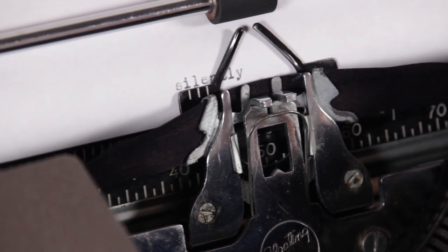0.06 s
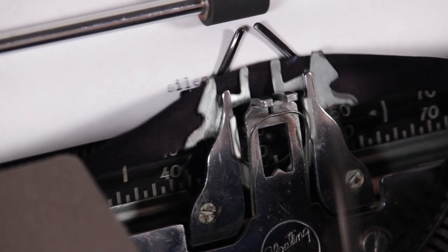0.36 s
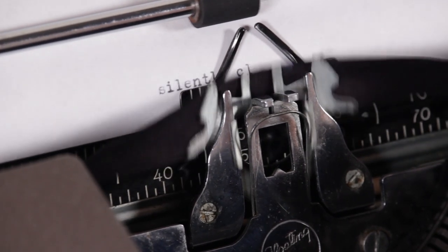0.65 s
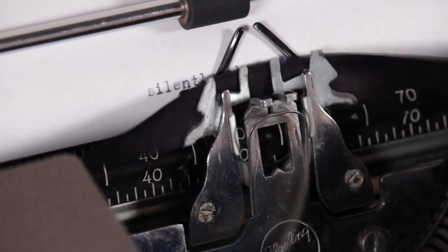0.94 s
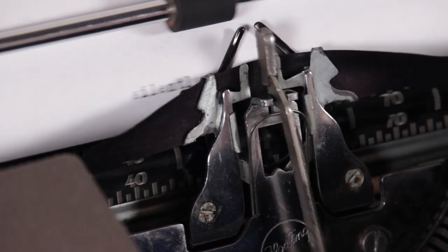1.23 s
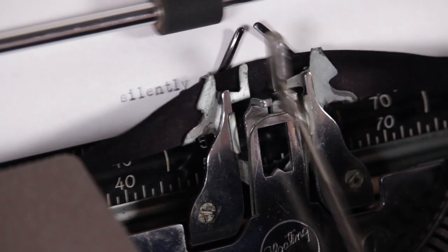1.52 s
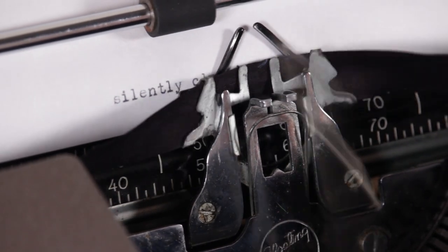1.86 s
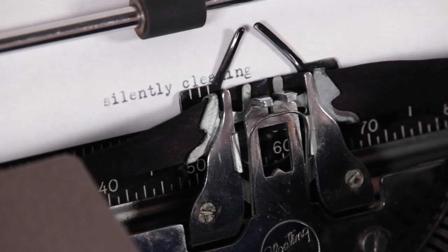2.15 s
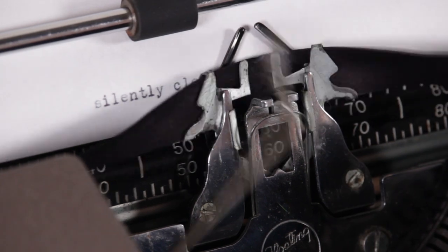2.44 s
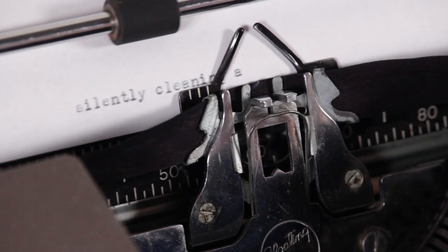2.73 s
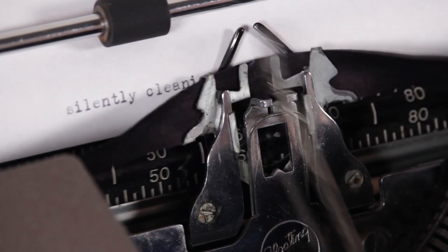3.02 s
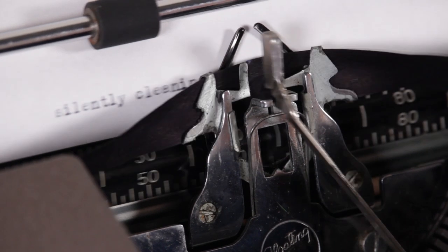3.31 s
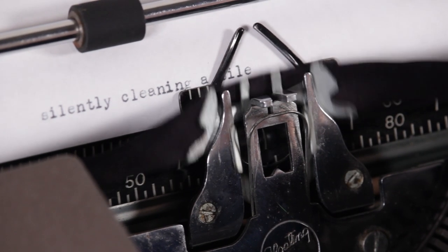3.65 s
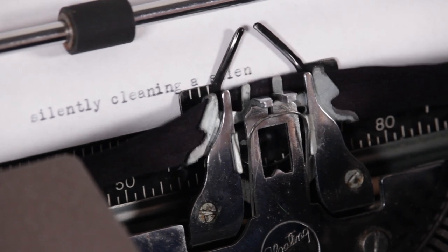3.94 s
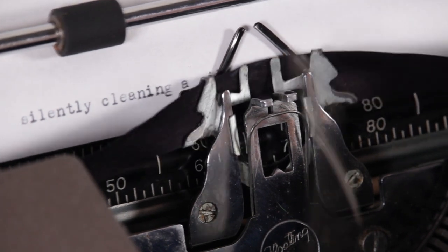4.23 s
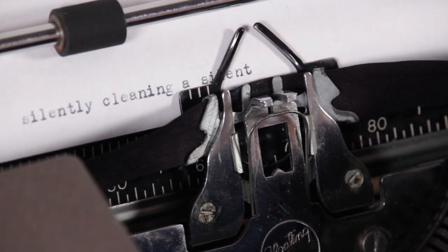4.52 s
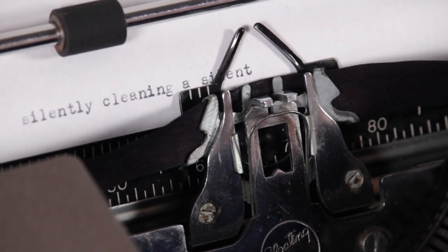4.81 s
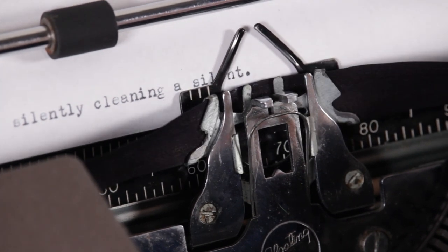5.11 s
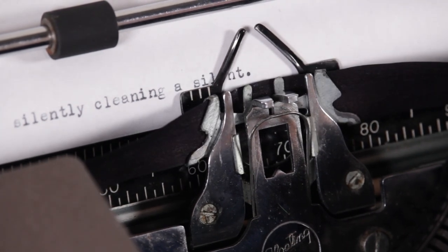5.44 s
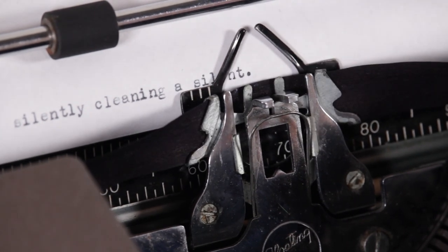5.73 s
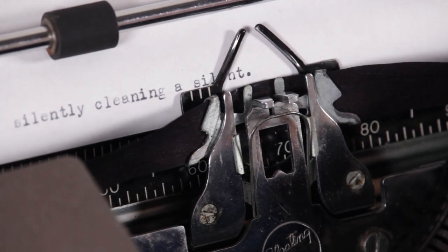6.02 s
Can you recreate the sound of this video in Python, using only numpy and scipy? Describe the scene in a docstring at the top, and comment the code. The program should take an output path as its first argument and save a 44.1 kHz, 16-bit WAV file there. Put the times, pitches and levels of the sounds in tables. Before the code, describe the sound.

Steady, crisp key strikes on a manual typewriter, with small carriage clicks between them and a faint hum in a small room.

```python
"""Manual typewriter, close up

A portable machine in a small room, typed on at an even pace close to a stereo microphone. Each key
works its linkage, throws a type bar against the platen and shakes the case; on release the escapement
snaps and the carriage rumbles one step on. The space bar clatters three times; a low hum lies beneath."""
import sys
import numpy as np
from scipy import signal
from scipy.fft import rfft, irfft
from scipy.io import wavfile
from scipy.ndimage import uniform_filter1d, minimum_filter1d

SR = 44100
rng = np.random.default_rng(int(sys.argv[2]) if len(sys.argv) > 2 else 0)


def wav_out(sig):
    """Save sig, one row per channel (or a flat mono array), as 16-bit PCM at SR to the path in sys.argv[1]."""
    wavfile.write(sys.argv[1], SR, np.round(np.clip(np.atleast_2d(sig).T, -1, 1) * 32767).astype(np.int16))


N = 267687

# space bar strokes: (press [s], press level [dB], return [s], return level [dB], carriage rumble [dB])
SPACES = [(0.002, -32, 0.1405, -32, -41), (2.2407, -36.5, 2.3414, -31, -41),
          (2.689, -35, 2.792, -30, -44.5)]
# keystrokes: (blow on the platen [s], level [dB], tilt [dB/octave], key travel before the blow [s],
# key touch [dB], touch tilt [dB/octave], ribbon lifter [dB], guide brush [dB], rebound [dB],
# sub-bass pulse [dB])
KEYSTROKES = [(0.318, -10.5, 0, 0.053, -34.5, 2, -28, -16.5, -5.5, -46),
              (0.574, -12.5, .5, 0.043, -33, 0, -43, -18, -9, -34.5),
              (0.778, -14.5, -.5, 0.055, -28, 0, -28, -14.5, -10, -51),
              (1.0198, -10.5, 0.5, 0.055, -29, 2, -27, -14.5, -12.5, -36.5),
              (1.2489, -7, .5, 0.045, -29.5, 3.5, -41, -17, -9, -44),
              (1.5342, -8.5, .5, 0.04, -31, 1.5, -41, -5.5, -7, -25.5),
              (1.839, -8.5, 1, 0.047, -25.5, 8.5, -28, -9.5, -5, -33),
              (2.0093, -8.5, 0.5, 0.052, -30.5, -1, -27.5, -16.5, -9.5, -44),
              (2.49, -9, 0.5, 0.048, -27.5, 8, -26, -14, -11.5, -27),
              (2.8874, -12, 1.5, 0.055, -30.5, 1, -28, -21, -9, -31),
              (3.0774, -10, 1, .066, -28, 2, -28.5, -19, -11, -51),
              (3.3516, -9, 1, 0.044, -32, 2, -29.5, -11.5, -8.5, -30.5),
              (3.615, -12, 1, 0.049, -28, 0.5, -29, -19, -12, -29),
              (3.8974, -11, 1.5, 0.059, -27.5, 1.5, -33, -6, -11.5, -46),
              (4.2325, -8, 2, 0.048, -22, 7, -23.5, -10.5, -7.5, -41),
              (4.9676, -12.5, -0.5, 0.046, -29.5, 4, -28, -12, -8, -48)]
# escapement snaps as keys come up: (time [s], level [dB], tilt [dB/octave], carriage rumble [dB])
KEY_RELEASES = [(0.448, -26, 1, -32), (0.669, -37.5, -2.5, -42), (0.885, -27, .5, -46),
                (1.1522, -25, .5, -42.5), (1.3691, -26, 0.5, -37), (1.657, -33, -3.5, -42.5),
                (2.1371, -32.5, -1.5, -47), (2.6188, -26, -0.5, -40), (3.211, -30.5, -0.5, -38.5),
                (3.4894, -25.5, -1, -37.5), (3.722, -27.5, 0, -45.5), (3.9986, -28, 0, -37.5),
                (4.3459, -22, -0.5, -38.5), (5.0952, -25, 0, -43)]
# spectrum of a type bar's contact: (frequency [Hz], level [dB])
TYPE_BAR_COLOUR = [(100, -5.5), (400, -9.5), (1000, -13.5), (1700, -10.5), (3300, -10), (5000, -6),
                   (6900, 2), (8200, -3), (10300, -13.5), (12000, -11.5), (14000, -16), (15500, -11.5)]
# spectrum of the hollow body under the carriage: (frequency [Hz], level [dB])
BODY_COLOUR = [(60, -14.5), (150, 4), (220, -7.5), (300, 0.5), (450, -7), (540, -2.5), (750, -13),
               (1100, -17), (2500, -21), (6000, -24)]


def undb(db):
    """Decibels to gain."""
    return 10 ** (np.asarray(db) / 20)


def unit(x):
    """Scale to rms 1."""
    return x / np.sqrt(np.mean(x ** 2))


def fade(t, t60):
    """Exponential decay that starts at t = 0 and falls 60 dB in t60 seconds."""
    return (t >= 0) * np.exp(-np.log(1000) * np.maximum(t, 0) / t60)


def add(track, s, x):
    """Mix x into track from time s on."""
    i = max(int(s * SR), 0)
    track[i:i + len(x)] += x[:max(N - i, 0)]


def response(colour, tilt_db=0, size=1024):
    """Impulse response of unit energy with a given colour, tilted in dB per octave above about 1 kHz."""
    hz, db = np.transpose(colour)
    octave = np.log2(np.maximum(np.fft.rfftfreq(size, 1 / SR), 1))
    db = np.interp(octave, np.log2(hz), db) + tilt_db * np.maximum(octave, 10)
    cepstrum = irfft(np.log(undb(db)))
    cepstrum[size // 2:] = 0  # minimum phase keeps attacks sharp
    cepstrum[0] = 0
    impulse = irfft(np.exp(rfft(2 * cepstrum)))
    return impulse / np.linalg.norm(impulse)


def through(x, impulse):
    """Pass a sound through an impulse response."""
    return signal.oaconvolve(x, impulse)[:N]


def stereo(mid, side):
    """Left and right from mid and side."""
    return np.array([mid + side, mid - side])


def hum(width=0.6, waver=0.083, air_db=-43, right_bias_db=2):
    """Room tone: wavering mains and motor hum over rumble and faint hiss, a little to the right."""
    # mains and motor tones: (frequency [Hz], level [dB])
    hum_tones = [(43, -65.5), (92, -52), (98, -54.5), (120, -53), (360, -69), (418, -75)]
    # spectrum of the room's rumble and hiss: (frequency [Hz], level [dB])
    air_colour = [(10, -19.5), (25, -11), (34, -12), (65, -1), (95, -1), (130, -9), (165, -21.5),
                  (250, -22), (360, -31), (600, -38.5), (1200, -42.5), (4000, -48.5), (15000, -48)]
    t = np.arange(N) / SR
    air_filter = response(air_colour, size=8192)
    mid, side = (through(noise, air_filter) for noise in rng.standard_normal((2, N)))
    air = undb(air_db) * stereo(mid, width * side)
    tones, knots = 0, np.linspace(0, t[-1], 24)
    for hz, db in hum_tones:
        swell, drift = (waver * np.interp(t, knots, r) for r in rng.standard_normal((2, len(knots))))
        tones += undb(db) * np.sqrt(2) * (1 + swell) * np.sin(2 * np.pi * hz * t + 2 * drift)
    return (air + tones) * undb([[-right_bias_db / 2], [right_bias_db / 2]])


def chatter(t, grain_db=4):
    """Noise in uneven grains of 32 samples: loose parts making many micro-contacts."""
    noise, size = rng.standard_normal((2, len(t)))
    return unit(np.repeat(undb(grain_db * size), 32)[:len(t)] * noise)


def click(colour, tilt_db, snap_t60, rattle_t60, rattle_db, slide_s):
    """Small steel parts slide into contact, snap together, then rattle on in little taps over a scrape."""
    taps_per_s, tap_t60, tap_spread_db, scrape_db = 240, 0.01, 2.2, -3
    t = np.arange(SR // 7) / SR
    snap, grain, size = rng.standard_normal((3, len(t)))
    hits = (rng.random(len(t)) < taps_per_s / SR) * undb(tap_spread_db * size)
    taps = unit(grain * through(hits, fade(t, tap_t60))[:len(t)] + 1e-9)
    rattle = undb(rattle_db) * unit(taps + undb(scrape_db) * chatter(t)) * fade(t, rattle_t60)
    contact = (snap * fade(t, snap_t60) + rattle) * (1 - np.exp(-t / slide_s))
    return through(contact, response(colour, tilt_db))


def space_bar(gain_db=2, stop_s=0.042, stop_db=1, bounce_s=0.031, bounce_db=-5):
    """The long bar rattles down and knocks on its stop, then springs back and bounces once."""
    # spectrum of the bar's contacts: (frequency [Hz], level [dB])
    colour = [(150, 9.5), (600, 0), (1200, -6.5), (2600, -8), (3700, -8), (4500, -4), (5400, -2), (6400, 0),
              (8800, -4), (10200, -11.5), (15500, -17.5)]
    track = np.zeros(N)
    for down_s, down_db, up_s, up_db, _ in SPACES:
        press = (down_s, down_db, stop_s, stop_db)
        spring_back = (up_s, up_db, bounce_s, bounce_db)
        for s, db, knock_s, knock_db in press, spring_back:
            rattle = click(colour, -0.14, snap_t60=0.063, rattle_t60=0.17, rattle_db=-5.5, slide_s=39e-5)
            knock = click(colour, -2.2, snap_t60=0.038, rattle_t60=0.37, rattle_db=-8, slide_s=0.0008)
            add(track, s, undb(db) * rattle)
            add(track, s + knock_s, undb(db + knock_db) * knock)
    return undb(gain_db) * track


def ring(contacts, modes):
    """Contacts plus the decaying modes they excite."""
    t = np.arange(SR // 3) / SR
    impulse = 0
    for hz, t60, db in modes:
        resonance_scale = 2 * np.log(1000) / (t60 * SR)
        impulse += undb(db) * resonance_scale * np.cos(2 * np.pi * hz * t) * fade(t, t60)
    return contacts + through(contacts, impulse)


def carriage_spring(contacts):
    """Contacts set the carriage spring ringing briefly."""
    # spring modes: (frequency [Hz], t60 [s], level over the plain contact [dB])
    spring_modes = [(4450, .06, 3.5), (4600, .08, 2.5)]
    return ring(contacts, spring_modes)


def shove(db, t60, hold_s=0, rise_s=0.0053):
    """Power of the carriage rumble after one shove: a quick rise, a hold and a decay."""
    t = np.arange(SR) / SR
    return (undb(db) * (1 - np.exp(-t / rise_s)) * fade(np.maximum(t - hold_s, 0), t60)) ** 2


def shaking(step_t60=0.24, roll_s=0.019):
    """How hard the carriage shakes: every key touch, blow, step and space shoves it."""
    power = np.zeros(N)
    touch, blow = shove(db=-39.5, t60=0.44), shove(db=-35, t60=0.65)
    for s, _, _, travel_s, *_ in KEYSTROKES:
        add(power, s - travel_s, touch)
        add(power, s, blow)
    for s, *_, db in KEY_RELEASES:
        add(power, s, shove(db, step_t60, roll_s))  # it rolls for a moment before it is caught
    for down_s, _, up_s, _, db in SPACES:
        add(power, down_s, shove(db - 0.5, step_t60, roll_s))
        add(power, up_s, shove(db, step_t60, hold_s=0.087))  # the returning bar shakes it for longer
    return np.sqrt(power)


def carriage(gain_db=-1, bumps_per_s=700, grain_db=4, knocks_per_s=150, knock_t60=0.055, knock_db=-3):
    """Rollers rumble in the hollow body while levers and rails knock, each with its own short ring."""
    bumps = rng.standard_normal(N) * (rng.random(N) < bumps_per_s / SR)
    bumps *= undb(grain_db * rng.standard_normal(N))
    knocks, t = np.zeros(N), np.arange(SR // 10) / SR
    decay = fade(t, knock_t60)
    for when, pitch, size in rng.random((int(knocks_per_s * N / SR), 3)):
        hz = 170 + 800 * pitch
        add(knocks, when * N / SR, size ** 3 * np.sin(2 * np.pi * hz * t) * decay)
    rollers = unit(through(bumps, response(BODY_COLOUR)))
    rails = unit(through(knocks, response(BODY_COLOUR, tilt_db=0.98)))
    return undb(gain_db) * unit(rollers + undb(knock_db) * rails) * shaking()


def linkage(take_up_s=0.0115, take_up_db=-6, lifter_lead_s=0.0185):
    """Before each blow the key is touched, its lever takes up the play and the ribbon lifter jumps."""
    # spectrum of the levers' contacts: (frequency [Hz], level [dB])
    colour = [(150, 2.5), (600, 1), (1300, -8), (3500, -7.5), (5500, -0.5), (7200, 1.5), (10000, -5.5),
              (15500, -8)]
    track = np.zeros(N)
    for s, _, _, travel_s, touch_db, tilt_db, lifter_db, *_ in KEYSTROKES:
        touch = click(colour, tilt_db, snap_t60=0.012, rattle_t60=0.31, rattle_db=-5, slide_s=0.000408)
        take_up = click(colour, -0.5, snap_t60=0.025, rattle_t60=0.31, rattle_db=-5, slide_s=0.0007)
        lifter = click(colour, 1.2, snap_t60=0.02, rattle_t60=0.31, rattle_db=-1.5, slide_s=0.0007)
        add(track, s - travel_s, undb(touch_db) * touch)
        add(track, s - travel_s + take_up_s, undb(touch_db + take_up_db) * take_up)
        add(track, s - lifter_lead_s, undb(lifter_db) * lifter)
    return track


def steel_frame(contacts):
    """Contacts set the type bars and the frame ringing."""
    # modes of bars and frame: (frequency [Hz], t60 [s], level over the plain contact [dB])
    steel_modes = [(1142, 0.11, -5.5), (1550, 0.031, -2.5), (2077, 0.059, -10), (4637, 0.17, -2.5),
                   (4900, 0.087, -0.5), (5400, .1, 0.5), (5860, .1, -1), (6088, .2, -6), (6337, 0.22, -12),
                   (6807, 0.055, -0.5), (7123, .12, -8), (7150, .12, -7), (8920, .025, -0.5),
                   (12300, .03, -6), (15100, .02, -11.5)]
    return ring(contacts, steel_modes)


def type_bars(crack_t60=0.022, rebound_t60=0.015, guide_lead_s=0.0055, guide_db=-4, gain_db=4.5):
    """A bar brushes the type guide, hits the platen and rebounds four times, each time more weakly."""
    track = np.zeros(N)
    t = np.arange(SR // 12) / SR - guide_lead_s
    for s, db, tilt_db, *_, brush_db, rebound_db, _ in KEYSTROKES:
        brush = undb(guide_db + brush_db) * fade(t + guide_lead_s, t60=0.11)
        power = fade(t, crack_t60) ** 2 + brush ** 2
        gaps_s = rng.uniform(0.0023, 0.0055, size=4)
        for k, rebound_s in enumerate(np.cumsum(gaps_s)):
            power += (undb(rebound_db - 1.6 * k) * fade(t - rebound_s, rebound_t60)) ** 2
        contact = np.sqrt(power) * rng.standard_normal(len(t))
        blow = through(contact, response(TYPE_BAR_COLOUR, tilt_db))
        add(track, s - guide_lead_s, undb(db + gain_db) * blow)
    return track


def loose_bars(rattle_t60=0.39, gain_db=-17, tilt_db=0.1, width=0.7):
    """After each blow the resting bars shiver across the whole width of the basket."""
    tracks, t = np.zeros((2, N)), np.arange(SR // 2) / SR
    for s, db, *_, rebound_db, _ in KEYSTROKES:
        envelope = undb(db + gain_db + 0.14 * rebound_db) * fade(t, rattle_t60)
        for track in tracks:
            add(track, s, envelope * chatter(t, grain_db=1.5))
    mid, side = (through(track, response(TYPE_BAR_COLOUR, tilt_db)) for track in tracks)
    return stereo(mid, width * side)


def case(ring_db=-29, sway_hz=43, sway_t60=1.9, sway_db=-38):
    """Each blow rings the panels of the case and sets the table swaying sideways."""
    # modes of the hollow case: (frequency [Hz], t60 [s], level [dB])
    panel_modes = [(128, 0.21, -18), (158, 0.12, -4), (301, .2, -2), (335, .16, 0), (530, 0.16, -5)]
    mid, side = np.zeros((2, N))
    t = np.arange(SR * 3 // 4) / SR
    panels = sum(undb(db) * np.sin(2 * np.pi * hz * t) * fade(t, t60) for hz, t60, db in panel_modes)
    sway = undb(sway_db) * np.sin(2 * np.pi * sway_hz * t) * fade(t, sway_t60)
    for s, db, *_ in KEYSTROKES:
        add(mid, s, undb(db + ring_db) * panels)
        add(side, s, sway)
    return stereo(mid, side)


def low_pulse(gain_db=9, pulse_t60=0.22, rise_t60=0.01386):
    """A brief one-sided sub-bass pulse under each blow, as from an overloaded microphone."""
    track, t = np.zeros(N), np.arange(SR * 3 // 4) / SR
    pulse = fade(t, rise_t60) - fade(t, pulse_t60)
    for s, *_, pulse_db in KEYSTROKES:
        add(track, s, undb(pulse_db + gain_db) * pulse)
    return track


def escapement(gain_db=4, scrape_lead_s=0.005, scrape_db=-14):
    """The pawl scrapes off its tooth, lets the carriage go and catches the next one."""
    # spectrum of the pawl's contacts: (frequency [Hz], level [dB])
    colour = [(150, 3), (600, -1.5), (1300, -8), (3500, -8), (5500, -1), (7500, 4.5), (10000, 0.5),
              (12000, 0.5), (15500, -2.5)]
    track = np.zeros(N)
    for s, db, tilt_db, _ in KEY_RELEASES:
        scrape = click(colour, tilt_db, snap_t60=0.036, rattle_t60=0.11, rattle_db=-12.5, slide_s=0.0019)
        catch = click(colour, tilt_db, snap_t60=0.037, rattle_t60=0.17, rattle_db=-13, slide_s=0.00035)
        add(track, s - scrape_lead_s, undb(db + scrape_db) * scrape)
        add(track, s, undb(db) * catch)
    return undb(gain_db) * track


def settling_ticks(tick_t60=0.015, knock_t60=0.052, knock_hz=185, body_t60=0.017, body_db=1):
    """With the machine at rest, a part settles with a thin tick and a soft hollow knock of the case."""
    # parts settling: (time [s], tick level [dB], knock level [dB])
    settlings = [(4.6634, -42.5, -62.5), (5.5207, -48, -39.5)]
    # spectrum of the tick: (frequency [Hz], level [dB])
    colour = [(500, -12), (2500, -21), (4700, 0.5), (6500, -0.5), (8200, 6.5), (9500, -17.5), (15000, -32)]
    track, t = np.zeros(N), np.arange(SR // 10) / SR
    knock = np.sqrt(2) * np.sin(2 * np.pi * knock_hz * t) * fade(t, knock_t60)
    for s, tick_db, knock_db in settlings:
        contact = rng.standard_normal(len(t))
        tick = through(contact * fade(t, tick_t60), response(colour))
        body = through(contact * fade(t, body_t60), response(BODY_COLOUR, tilt_db=-1))
        add(track, s, undb(tick_db) * tick)
        add(track, s, undb(knock_db + body_db) * body)
        add(track, s, undb(knock_db) * knock)
    return track


def panel_spread(machine, spread_db=-14, length=600):
    """The panels throw a quick, slightly different reflection to each side of the microphone."""
    # spectrum of the sound thrown sideways: (frequency [Hz], level [dB])
    colour = [(80, 13), (160, 17), (250, 11), (330, 7.5), (2000, 0), (4000, 0), (7000, -10), (8200, -6),
              (10000, 11), (13000, -14.5), (15500, -5.5)]
    scatter = rng.standard_normal(length) * np.linspace(1, 0, length)
    impulse = np.convolve(scatter, response(colour))
    side = undb(spread_db) * through(machine, impulse / np.linalg.norm(impulse))
    return stereo(machine, side)


def room(x, width=0.37, build_s=0.0024):
    """The small room's diffuse reflections build up within milliseconds and die sooner in the treble."""
    # reverberation bands: (frequency [Hz], t60 [s], level [dB])
    bands = [(100, 0.52, -3.5), (305.6, 0.48, -1.5), (720, 0.52, 0.5), (1670, 0.33, -2), (3850, 0.44, -4.5),
             (7100, 0.55, -14), (10400, 0.33, -10.5), (15000, 0.28, -26)]
    t = np.arange(SR * 3 // 4) / SR
    hz, t60s, dbs = np.transpose(bands)
    log_hz = np.log(np.fft.rfftfreq(len(t), 1 / SR) + 1)
    spectrum = rfft(rng.standard_normal((2, len(t))))
    tail = 0
    for share, t60, db in zip(np.eye(len(hz)), t60s, dbs):
        envelope = fade(t, t60) * (1 - np.exp(-(t / build_s) ** 2))
        band = irfft(spectrum * np.interp(log_hz, np.log(hz), share), len(t))
        tail += undb(db) * band * envelope / np.linalg.norm(envelope)
    return stereo(through(x, tail[0]), width * through(x, tail[1]))


def scene(room_db=-2.5, drift_hz=0.8056):
    """The typewriter close in front of the microphone, with the room and its hum around it."""
    keys = steel_frame(type_bars() + escapement() + linkage())
    machine = keys + carriage_spring(space_bar() + settling_ticks()) + carriage()
    close = panel_spread(machine)
    lows = signal.sosfilt(signal.butter(1, 9, "high", fs=SR, output="sos"), case() + low_pulse())
    # moving hands and carriage keep changing the reflections: three patterns crossfade at even power
    turn = 2 * np.pi * drift_hz * np.arange(N) / SR
    reflections = sum(room(machine * np.cos(turn + k * np.pi / 3)) for k in range(3)) / np.sqrt(1.5)
    return close + loose_bars() + lows + undb(room_db) * reflections + hum()


def record(dry, ceiling=0.71, top_hz=15700):
    """Behind the microphone a fast limiter holds the blows down and a steep low-pass cuts the top."""
    gain = np.minimum(1, ceiling / (np.abs(dry).max(axis=0) + 1e-9))
    gain = uniform_filter1d(minimum_filter1d(gain, size=45), size=45)  # held and smoothed over 1 ms
    return signal.sosfilt(signal.ellip(10, 0.2, 70, top_hz, fs=SR, output="sos"), dry * gain)


dry = scene()
out = record(dry)
wav_out(out)
```